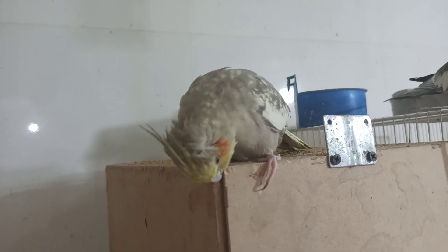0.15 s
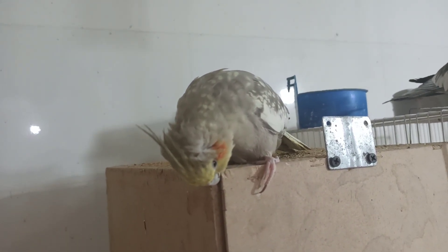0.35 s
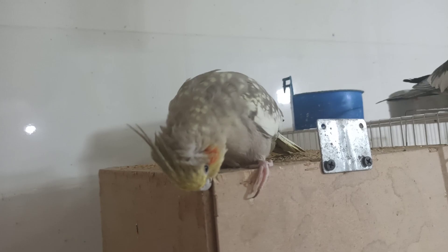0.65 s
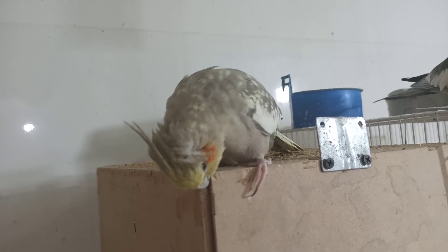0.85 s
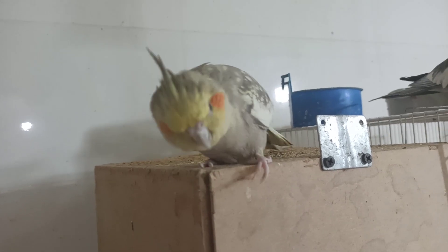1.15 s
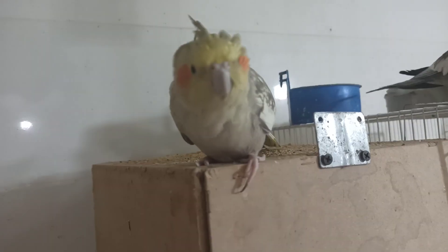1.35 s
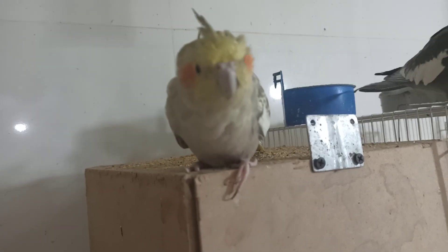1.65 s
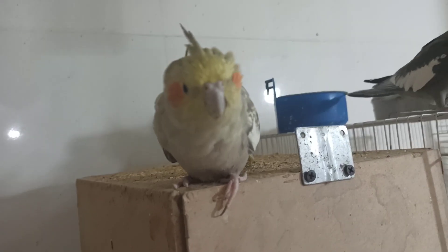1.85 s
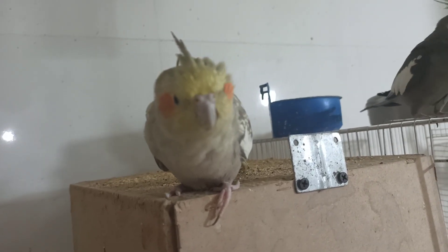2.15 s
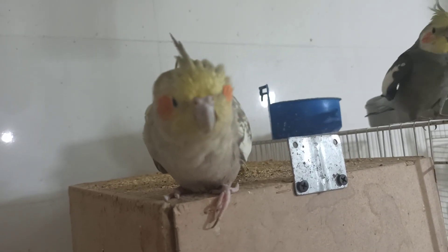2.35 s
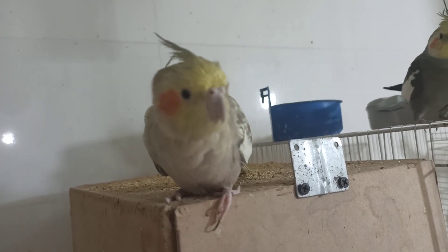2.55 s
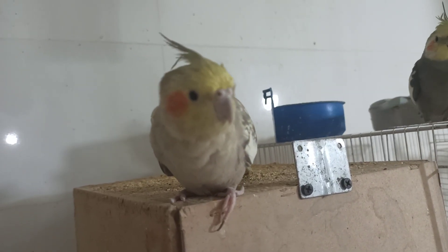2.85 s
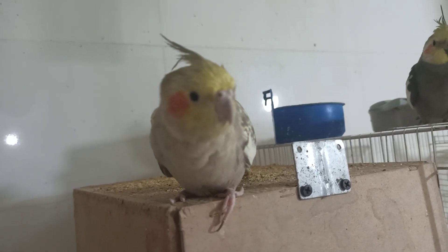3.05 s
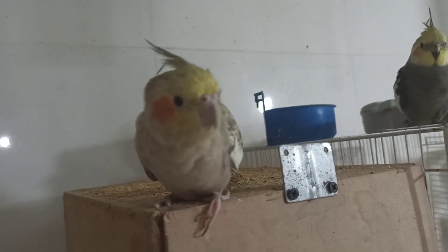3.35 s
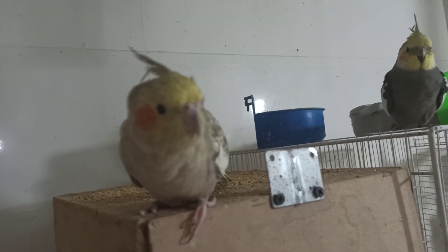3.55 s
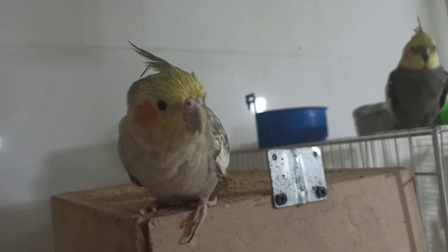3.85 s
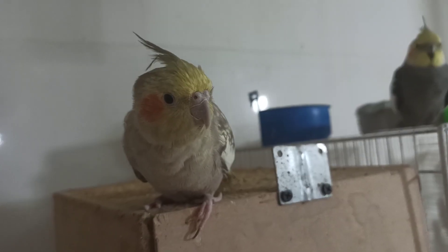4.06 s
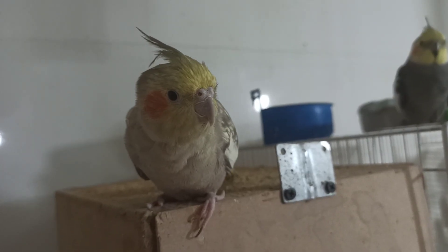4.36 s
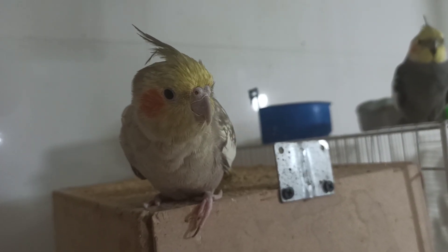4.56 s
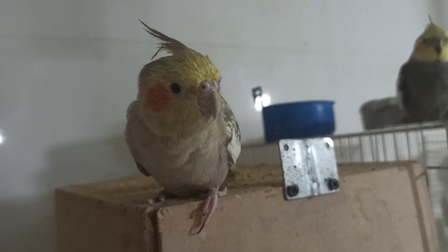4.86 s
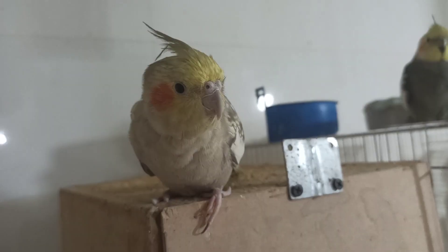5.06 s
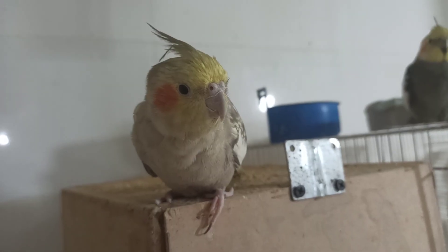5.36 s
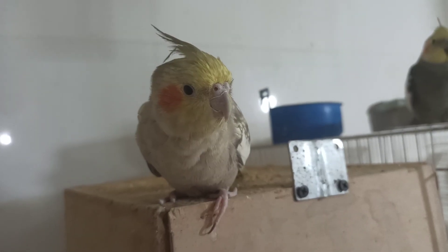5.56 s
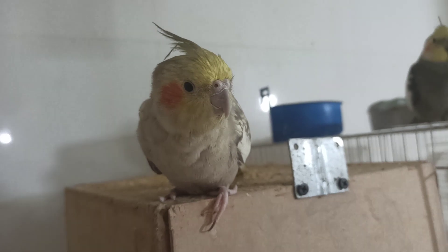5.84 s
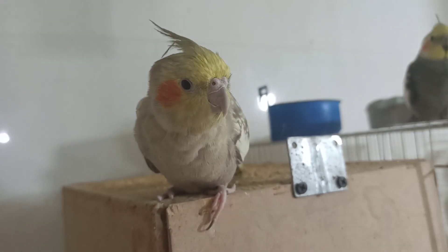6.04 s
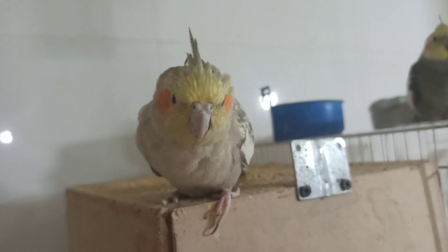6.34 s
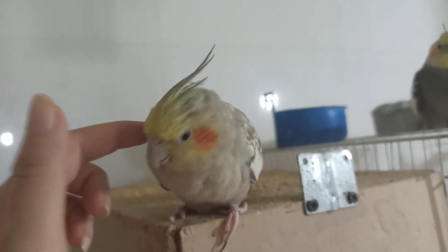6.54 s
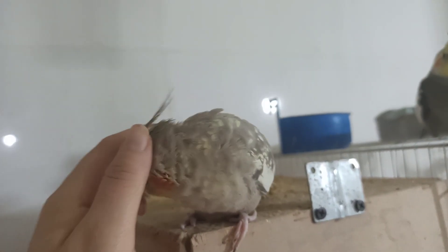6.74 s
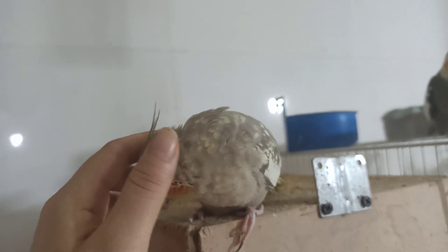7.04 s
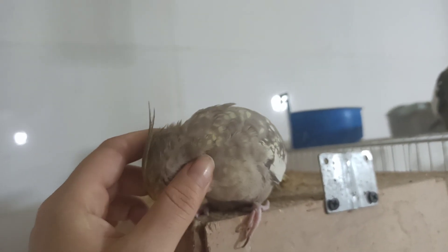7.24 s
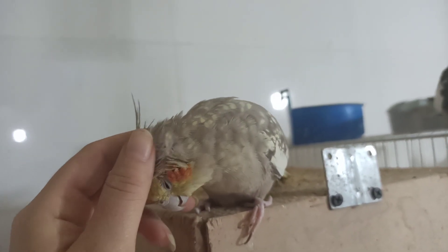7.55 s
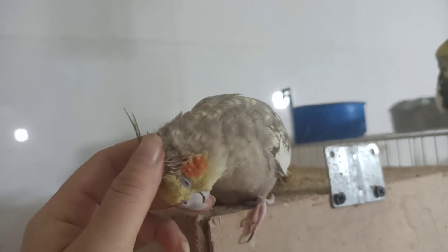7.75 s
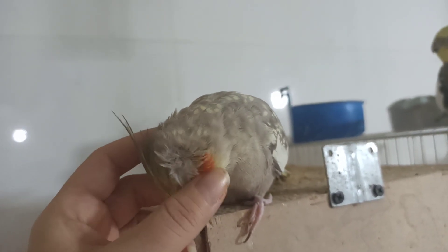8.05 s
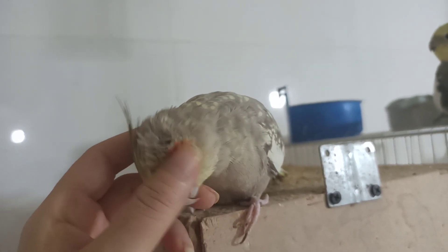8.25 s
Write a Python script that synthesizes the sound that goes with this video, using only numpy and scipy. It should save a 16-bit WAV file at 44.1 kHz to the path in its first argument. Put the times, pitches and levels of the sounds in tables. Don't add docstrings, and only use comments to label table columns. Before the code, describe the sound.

In a bare, hard-walled room, a cockatiel gives bursts of quick whistled chirps that swoop up and drop, sometimes hoarse, with a second bird faintly overlapping. Calls cluster through the first six seconds, with short gaps; then only rumble, a swelling low drone and small claw and beak ticks remain before one softer late chirp. A phone at some distance hears plenty of room echo.

```python
import sys
import numpy as np
from scipy import signal
from scipy.fft import rfft, irfft, next_fast_len
from scipy.io import wavfile
from scipy.ndimage import uniform_filter1d

SR = 44100
rng = np.random.default_rng(int(sys.argv[2]) if len(sys.argv) > 2 else 0)


def nominal_scale(level):
    x = np.asarray(level, float) / 20
    return 10 ** x


def unload_wav(signal):
    wavfile.write(
        sys.argv[1],
        SR,
        np.round(np.clip(np.atleast_2d(signal).T, -1, 1) * 32767).astype(np.int16),
    )


N = 370440
LEAD = SR // 2


def evened(x):
    return x / np.sqrt(np.mean(x ** 2) + 1e-20)


def read(points, hz):
    f, value = np.transpose(points)
    return np.interp(np.log(hz + 1), np.log(f + 1), value)


def wander(count, hz):
    b, a = signal.butter(2, min(hz, 9000) / (SR / 2))
    noise = rng.standard_normal(count + 4000)
    return evened(signal.filtfilt(b, a, noise)[2000:count + 2000])


def add(mix, s, sound):
    part = mix[LEAD + round(s * SR):][:len(sound)]
    part += sound[:len(part)]


def path(brightness_db, hoarseness, points):
    # f/Hz (pitch), level/dB
    overtones = [(1400, -4.5), (1900, -10.5), (2350, -7.5), (2900, -10), (3300, -9.5)]
    usual_db, purer = -18, 0.37
    hoarse_low, clear_hz = .6, 2700
    rasp, quick = .06, 6
    fall_loss_db = 4
    s, hz, effort_db = np.transpose(points)
    octaves_per_s = np.gradient(np.log2(hz), s)
    over_db = brightness_db + read(overtones, hz) - purer * (effort_db - usual_db)
    hoarse = hoarseness * (1 + hoarse_low * np.log2(clear_hz / hz))
    hoarse = np.clip(hoarse + rasp * np.minimum(abs(octaves_per_s) / quick, 1), 0, 1)
    effort_db = effort_db - fall_loss_db * np.clip(-octaves_per_s / quick, 0, 1)
    return np.transpose([s, hz, effort_db, over_db, hoarse])


def syllable(rows):
    # f/Hz, level/dB
    throat = [(900, -12.5), (1800, -5), (2600, 2.5), (3400, 1.5), (4000, 4), (4750, -1.5), (5150, -18),
              (5700, -12.5), (6900, -4), (8400, -14.5), (12000, -17.5), (13500, -29), (16000, -8)]
    s, *columns = np.transpose(rows)
    t = np.arange(s[0], s[-1], 1 / SR)
    smooth = (uniform_filter1d(np.interp(t, s, c), 200, mode="nearest") for c in columns)
    hz, effort_db, over_db, hoarse = smooth
    gliding = np.clip(abs(np.gradient(hz)) * SR / 9000, .3, 1)
    hz = hz * (1 + (0.026 + .03 * hoarse) * gliding * wander(len(t), hz=51.4))
    flutter = wander(len(t), hz=390.0)
    phase = 2 * np.pi * np.cumsum(hz) / SR + .52 * hoarse * flutter
    tremor_db = (1.3 + 4.16 * hoarse) * np.clip(wander(len(t), hz=60), -2, 2)
    voice = np.zeros(len(t))
    for k in range(1, 12):
        fall_db = (k > 1) * over_db - 3.37 * max(k - 2, 0)
        partial = np.cos(k * phase) * (k * hz < 16000)
        voice += nominal_scale(fall_db + read(throat, k * hz)) * partial
    hiss = signal.lfilter([1, -.6], [1], rng.standard_normal(len(t)))
    breath = nominal_scale(-14 + 0.23 * over_db) * np.clip(hoarse, .12, .3) * hiss
    edge = np.minimum(1, np.minimum(t - s[0], s[-1] - t) / 0.008)
    return s[0], np.sqrt(2) * nominal_scale(effort_db + tremor_db) * (voice + breath) * edge


def room(x):
    # f/Hz, t60/s
    decay = [(500, 0.35), (1500, 0.65), (2500, 0.74), (3500, 0.58), (5000, 0.5), (7000, 0.51),
             (12000, 0.17)]
    early_db, early_t60 = 4, .12
    length, out = SR, np.zeros((2, len(x)))
    head_turn = np.pi * np.arange(len(x)) / SR * 1.3
    for k in range(3):
        taps = np.zeros((2, length))
        slots = np.arange(260, length - 20, 12)
        at = slots + rng.integers(0, 12, (2, len(slots)))
        np.put_along_axis(taps, at, rng.choice([-1., 1.], at.shape), 1)
        hz, t, z = signal.stft(taps, SR, nperseg=128)
        dying = nominal_scale(-60 * t / read(decay, hz)[:, None])
        early = 1 + nominal_scale(early_db - 60 * t / early_t60)
        tail = signal.istft(z * dying * early, SR, nperseg=128)[1]
        tail = tail / np.linalg.norm(tail[0])
        share = np.sqrt(2 / 3) * np.cos(head_turn + k * np.pi / 3)
        out += signal.fftconvolve((x * share)[None], tail, axes=1)[:, :len(x)]
    return out


def floor():
    # t/s, level/dB
    breathing = [(0.0, -55.5), (1.199, -53), (4.199, -56), (5.302, -53.5), (6.401, -54.5), (7.301, -60),
                 (7.902, -52), (8.4, -57.5)]
    # f/Hz, likeness/1
    likeness = [(60, 1), (150, 0.88), (380, 0.69), (950, 0.061), (2380, -0.47), (5980, 0.69), (15000, -1.3)]
    # f/Hz, level/dB per Hz
    colour = [(20, -40), (50, -34.5), (75, -20), (100, 3), (140, -9), (165, -14.5), (280, -7.5), (520, -20),
              (900, -22), (4400, -28.5), (5400, -33.5), (7500, -27), (12000, -26), (14000, -28.5),
              (16000, -24)]
    frames, hz = N // 512 + 5, np.fft.rfftfreq(2048, 1 / SR)
    a, b, c, d, patches = rng.standard_normal((frames, 1025, 5)).T
    patches = evened(uniform_filter1d(uniform_filter1d(patches, 20, 0), 10, 1))
    s, level_db = np.transpose(breathing)
    swell_db = np.interp(np.arange(frames) * 512 / SR, s, level_db) - np.mean(level_db)
    same = np.clip(read(likeness, hz), -1, 1)[:, None]
    left = a + 1j * b
    right = same * left + np.sqrt(1 - same ** 2) * (c + 1j * d)
    z = np.array([left, right])
    z *= nominal_scale(read(colour, hz)[:, None] + 1.7 * patches + swell_db)
    return nominal_scale(-49) * evened(signal.istft(z, nperseg=2048, noverlap=1536)[1][:, :N])


def drone():
    # t/s (peak), level/dB, half-length/s
    swells = [(.8, -59, 0.31), (1.702, -47.5, 0.29), (2.201, -51.5, 0.092), (3.089, -58, .12),
              (3.604, -72.5, 0.33), (4.061, -60, 0.079), (4.421, -54.5, 0.14), (4.68, -51.5, 0.046),
              (5.262, -43.5, 0.14), (5.767, -48.5, 0.11), (6.221, -47.5, 0.351), (6.95, -58, 0.091),
              (7.25, -46.5, 0.17), (7.745, -54, 0.22), (8.035, -49, 0.06), (8.296, -56.5, 0.33)]
    rest_db, drop_db = -75, -11
    t = np.arange(N) / SR
    level = nominal_scale(rest_db) + sum(nominal_scale(db + drop_db * ((t - s) / half) ** 2) for s, db, half in swells)
    hz = 132.5 + 2.3 * wander(N, hz=3.2)
    return np.sqrt(2) * level * np.sin(2 * np.pi * np.cumsum(hz) / SR)


def tick(row):
    s, peak_db, middle_db, dull_db, t60 = row
    t = np.arange(6000) / SR
    noise = rng.standard_normal(len(t))

    def band(low_hz, high_hz):
        sos = signal.butter(2, [low_hz, high_hz], "band", fs=SR, output="sos")
        return evened(signal.sosfilt(sos, noise))

    bright, middle, dull = band(9500, 16000), band(6000, 8600), band(900, 4800)
    middle_db = min(middle_db, 6)
    scratch = bright + nominal_scale(middle_db) * middle + nominal_scale(dull_db) * dull
    scratch = nominal_scale(-60 * t / max(t60, .003)) * scratch
    wire = nominal_scale(middle_db - 14 - 60 * t / .15) * np.sin(2 * np.pi * 7530 * t)
    return s, nominal_scale(peak_db) * (scratch + wire)


def scene():
    # (t/s, pitch f/Hz, effort
    # level/dB)
    calls = [
        (18.5, 1, [(-.35, 2500, -32.5), (-.3, 2400, -23.5), (-.29, 3600, -25.5), (-.2, 3766, -30.5)]),
        (2.5, 0.45, [(.258, 2480, -32), (.266, 2410, -31), (.272, 1764, -28.5), (.283, 2516, -24), (.305, 2720, -29.5), (.355, 2912, -23.5), (.375, 2566, -21), (.39, 1960, -21.5), (.405, 1700, -38)]),
        (-5.5, 0.34, [(.475, 1575, -33), (.495, 2232, -22.5), (.515, 2430, -15), (.53, 2780, -16.5), (.56, 3072, -18), (.6, 3176, -14.5)]),
        (12, 0.2, [(.543, 1550, -29), (.558, 1920, -20), (.575, 2050, -18), (.587, 2260, -19), (.6, 2350, -22)]),
        (0.5, 0.31, [(.598, 2500, -18), (.615, 2800, -20), (.635, 3157, -12.5), (.66, 3010, -5.5), (.68, 2250, -11.5), (.715, 1855, -16)]),
        (6.5, 0.57, [(.715, 1855, -27), (.745, 2361, -11), (.765, 2252, -10), (.78, 1406, -16.5)]),
        (-0.5, 0.13, [(.785, 1874, -35.5), (.81, 2237, -19.5), (.835, 2160, -31)]),
        (-21, .05, [(.925, 1373, -27.5), (1.01, 1390, -47)]),
             (3.5, 0.084, [(1.257, 1251, -33), (1.285, 1763, -22), (1.297, 2111, -21), (1.31, 2318, -12.5), (1.33, 2695, -14.5), (1.347, 3168, -9.5), (1.385, 3251, -13), (1.41, 2368, -16.5), (1.45, 2106, -21)]),
        (2, 0.15, [(1.45, 1995, -13), (1.475, 2405, -15), (1.5, 2336, -23), (1.525, 2765, -13), (1.55, 3125, -12.5), (1.62, 3276, -9), (1.67, 1685, -27)]),
        (6, 0.3, [(2.322, 1431, -22.5), (2.345, 2003, -27.5), (2.37, 2308, -9), (2.405, 2718, -23.5), (2.415, 3119, -1), (2.445, 3286, -19.5), (2.485, 2544, -26)]),
        (1.5, 0.053, [(2.485, 2720, -6), (2.51, 2221, -10), (2.56, 2455, -18.5), (2.62, 2340, -13.5)]),
             (-6, 0.4, [(2.907, 1480, -27.5), (2.925, 1873, -21.5), (2.945, 2004, -28)]),
        (11.5, 0.31, [(2.955, 1597, -33.5), (2.968, 1953, -18.5), (2.982, 2102, -21.5), (2.998, 2520, -16.5)]),
        (5, 0.16, [(2.997, 3085, -20), (3.03, 3254, -11.5), (3.07, 3344, -16.5), (3.085, 3314, -5), (3.098, 2630, -14), (3.11, 2130, -17.5), (3.13, 1364, -23)]),
        (-12, .1, [(3.346, 1210, -25), (3.367, 1430, -25), (3.39, 1640, -25), (3.41, 1850, -25), (3.428, 2100, -24)]),
        (-6, 0.25, [(3.422, 2472, -19.5), (3.45, 2782, -32), (3.48, 2860, -25), (3.495, 2395, -29.5), (3.51, 1826, -11), (3.535, 1800, -43)]),
        (-7.5, 0.34, [(3.505, 978, -28), (3.535, 1004, -30), (3.56, 1356, -20)]),
        (0, 0.08, [(3.558, 1450, -29), (3.58, 1620, -27), (3.6, 1780, -26), (3.632, 1806, -26), (3.652, 1480, -30)]),
             (-1, 0.29, [(4.583, 1658, -26), (4.598, 2207, -21.5), (4.625, 2380, -21), (4.64, 2752, -15.5), (4.68, 2976, -16), (4.72, 3312, -15.5), (4.78, 2975, -16.5), (4.815, 2916, -14), (4.84, 1806, -17.5)]),
        (3, 0.5, [(4.63, 1418, -34), (4.69, 1647, -25), (4.72, 1841, -25), (4.77, 2184, -23)]),
        (2.5, 0.25, [(4.885, 1782, -13.5), (4.9, 1751, -16), (4.912, 2071, -21.5), (4.925, 2260, -16.5), (4.95, 2440, -21), (4.97, 2917, -13.5), (4.988, 2957, -23.5), (5.0, 2320, -7), (5.02, 1832, -22)]),
        (5, 0.057, [(5.02, 1747, -14.5), (5.043, 1782, -17.5), (5.062, 2308, -15), (5.11, 2343, -25), (5.135, 1955, -15)]),
        (4, 0.15, [(5.15, 2446, -16.5), (5.17, 2800, -22), (5.2, 3035, -19.5), (5.25, 1611, -27.5)]),
             (4.3, 0.2, [(5.508, 1514, -19), (5.53, 1755, -16.5), (5.547, 2170, -14.5), (5.585, 2376, -11.5), (5.6, 2714, -16.5), (5.615, 3130, -12.5), (5.64, 2274, -19), (5.655, 1840, -16.5)]),
        (3.7, 0.13, [(5.655, 1786, -19), (5.675, 1799, -16.5), (5.695, 2398, -10.5), (5.75, 2170, -19)]),
        (14.8, 0.23, [(5.789, 1904, -29), (5.8, 1999, -24), (5.815, 2054, -20.5), (5.828, 2315, -6)]),
        (5.3, 0.11, [(5.825, 3294, -14), (5.86, 3311, -10.5), (5.915, 3422, -6), (5.945, 2083, -27), (5.96, 1440, -19.5)]),
             (-31, .1, [(7.51, 2934, -64), (7.6, 3030, -75)]),
        (-16, 0.092, [(7.69, 1483, -44.5), (7.73, 1460, -50), (7.82, 1450, -78)]),
        (-3.5, 0.17, [(7.844, 1528, -20.5), (7.87, 1712, -30.5), (7.9, 1872, -26), (7.925, 2134, -24), (7.95, 2381, -16), (7.975, 2579, -17.5), (8.0, 2616, -29.5), (8.03, 2329, -17), (8.048, 1634, -31)]),
        (-18, 0.23, [(8.345, 1319, -33.5), (8.37, 1607, -35.5), (8.399, 1510, -49)]),
    ]
    # t/s, peak level/dB, middle
    # level/dB, dull level/dB, t60/s
    ticks = [(1.0997, -37, 0, -8, 0.12), (1.253, -30.5, -9.5, -26, 0.012), (1.7602, -29.5, -25, -11, 0.01),
             (2.0727, -23.5, -17, -23, 0.015), (2.2358, -44.5, -3, -17, 0.03),
             (2.318, -39.5, 0.5, -20, 0.012), (2.7, -43.5, -19, -27.5, 0.012),
             (2.776, -32, -2, -2.5, 0.013), (4.118, -49.5, 4.5, -2.5, 0.033),
             (4.3511, -40.5, -5, -10.5, 0.052), (4.3689, -39, 0.5, -10, 0.037),
             (5.4378, -43, 6, -23, 0.013), (6.347, -49.5, -0.5, 6.5, 0.068),
             (6.5902, -55.5, 5, -12.5, 0.029), (6.7638, -49, -8, -20, 0.015),
             (6.9456, -58, -6, -15.5, 0.011), (7.6083, -39, -31, -28, 0.035), (7.6905, -45.5, 10, 3, 0.026),
             (7.706, -50, -14, 6, 0.028), (7.7373, -31.5, -3, -8, 0.045), (7.746, -32, -14, -7, 0.019),
             (7.756, -41, 0.5, -24, 0.12), (7.785, -35.5, -15, -16, 0.027), (8.119, -25, -32, -28, 0.045),
             (8.131, -41, -16, -23, 0.015)]
    # t/s, left minus right level/dB
    perches = [(0, 3), (.3, -3.5), (0.603, 2.5), (3.202, 1.5), (3.497, 0), (4.602, 1), (5.602, 3),
               (7.601, -3), (7.9, 0), (8.4, 2.5)]
    lag = 17
    bird, claws = np.zeros(N + LEAD), np.zeros(N + LEAD)
    for call in calls:
        add(bird, *syllable(path(*call)))
    for row in ticks:
        add(claws, *tick(row))
    near = (nominal_scale(-6) * bird + nominal_scale(-3) * claws)[LEAD:]
    direct = np.array([np.roll(near, lag), near])
    echo = room(nominal_scale(0.5) * bird + nominal_scale(0.5) * claws)[:, LEAD:]
    side_db = np.interp(np.arange(N) / SR, *np.transpose(perches))
    balance = nominal_scale(np.array([side_db, -side_db]) / 2)
    return (direct + echo) * balance + floor() + drone()


def coloured(x, colour_db):
    size = next_fast_len(N)
    return irfft(rfft(x, size) * nominal_scale(colour_db), size)[:, :N]


def thinned(x):
    # f/Hz, level/dB
    mask = [(1000, -66), (4500, -56), (5600, -45), (7000, -55), (8300, -42), (10000, -55), (11700, -46),
            (15500, -46)]
    # f/Hz, kept while chance of rms 1 is under this/1
    kept = [(8500, 9), (8800, -.8), (11300, -1.3), (11600, 1), (15500, .8)]
    hz, t, z = signal.stft(x, SR, nperseg=2048, noverlap=1536)
    power = (abs(z[:, :1024]) ** 2).reshape(2, 64, 16, -1).mean(2)
    band_db = uniform_filter1d(10 * np.log10(power + 1e-20), size=3, axis=2)
    centre = hz[8:1024:16]
    limit_db = band_db[:, 3:].max(1, keepdims=True) + read(mask, centre)[:, None]
    limit_db += 5.5 * evened(uniform_filter1d(rng.standard_normal(band_db.shape), size=6, axis=2))
    chance = evened(uniform_filter1d(rng.standard_normal(band_db.shape[1:]), size=4, axis=1))
    keep = np.clip((band_db - limit_db) / 2, 0, 1) * (chance < read(kept, centre)[:, None])
    z[:, :1024] *= np.repeat(keep, 16, axis=1)
    return signal.istft(z, SR, nperseg=2048, noverlap=1536)[1][:, :N]


def band_limit(x):
    return signal.sosfilt(signal.butter(12, 16480, fs=SR, output="sos"), x)


def record(dry):
    # f/Hz, left minus right level/dB
    ports = [(100, 2), (500, 1), (2500, -6), (4500, -1), (8000, 4.5), (13000, -3)]
    # f/Hz, level/dB
    response = [(8400, 0), (8900, -13), (11300, -17), (11600, 0), (15500, 0), (15800, -70)]
    hz = np.fft.rfftfreq(next_fast_len(N), 1 / SR)
    x = coloured(dry, read(ports, hz) * np.array([[.5], [-.5]]))
    power_db = 10 * np.log10(abs(uniform_filter1d((x ** 2).mean(0), 600)) + 1e-12)
    fall = np.arange(N) * 70.0 / SR
    held_db = np.maximum.accumulate(power_db + fall) - fall
    over_db = np.maximum(held_db + 12.5, 0)
    x = x / nominal_scale(0.45 * uniform_filter1d(over_db, 300))
    x = np.clip(x, -.72, .76)
    mix = thinned(coloured(x, read(response, hz)))
    return band_limit(mix)


dry = scene()
out = record(dry)
unload_wav(out)
```